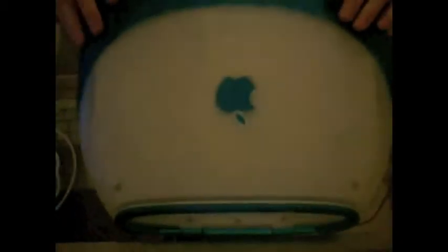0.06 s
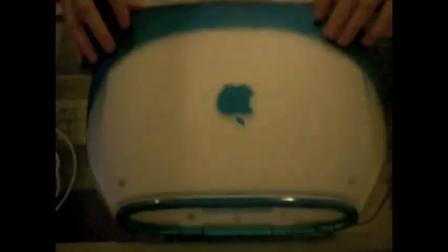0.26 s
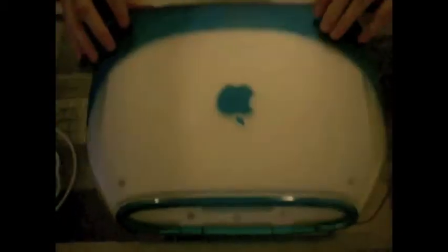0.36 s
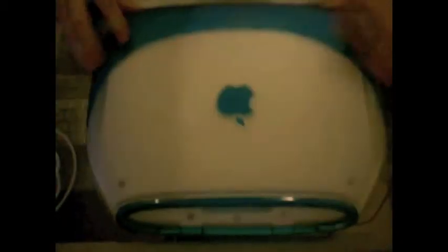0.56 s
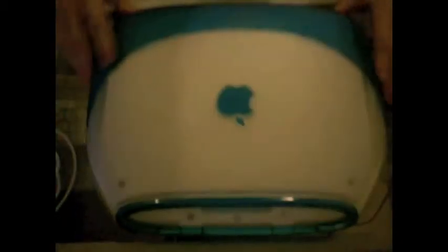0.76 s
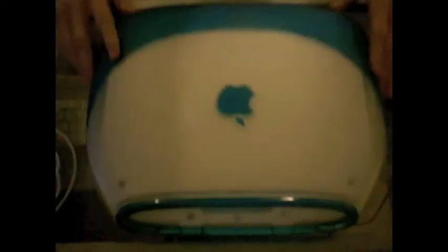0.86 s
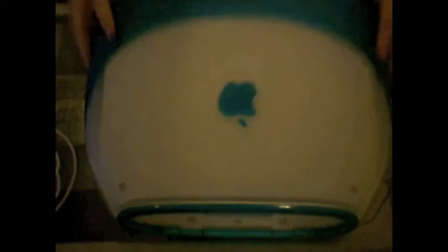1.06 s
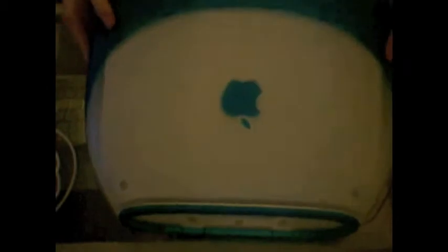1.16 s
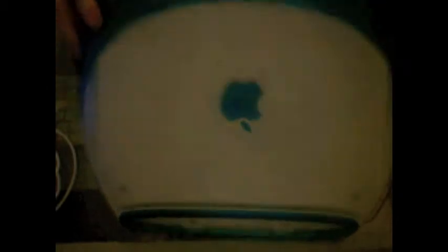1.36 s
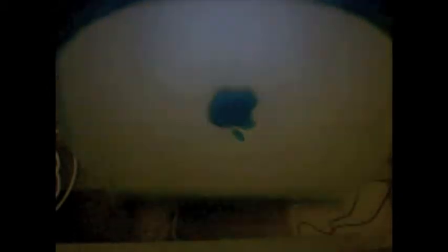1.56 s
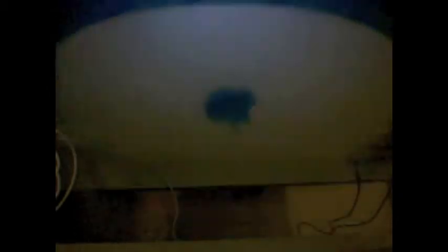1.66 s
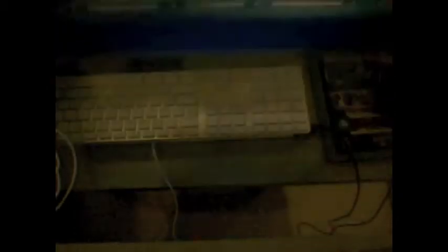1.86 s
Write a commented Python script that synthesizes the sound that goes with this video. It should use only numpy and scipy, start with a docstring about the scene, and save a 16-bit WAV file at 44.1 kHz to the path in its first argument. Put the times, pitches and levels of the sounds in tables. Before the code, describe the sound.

A plastic laptop is pressed shut and moved on a wooden table. Hands slide softly from 0.1 s, then the loudest clack and table thud land at 0.25 s. Quieter rubbing follows, with clustered knocks and creaks at 0.7-1.0 s, a firm thud at 1.2 s, a sharp tick at 1.3 s, then lighter clicks and slides until 1.9 s. Close, small quiet room, low wavering hum and hiss.

```python
"""On a wooden table in a small quiet room, a plastic laptop is pressed shut, shifted and lifted.
First sliding hands hiss and the shell knocks lightly; then the loudest blow, knock, tick and table thud together.
Creaks, knocks, thuds and ticks follow in bursts, made by short contacts that ring shell and table modes.
The last part is lighter knocks, ticks and slides. Throughout lie noise-driven table rumble, a wavering hum
and hiss, taken from one spot with far more direct sound than room, in two channels."""
import sys
import numpy as np
from scipy import signal
from scipy.fft import rfft, irfft
from scipy.io import wavfile
from scipy.ndimage import uniform_filter1d

SR = 44100
rng = np.random.default_rng(int(sys.argv[2]) if len(sys.argv) > 2 else 0)


def boost(x):
    """Linear amplitude factor 10**(x/20) for a level x in decibels (scalar or array-like)."""
    u = np.asarray(x, float) / 20
    return 10 ** u


def dump(signal):
    """Clip the signal to [-1, 1] and save it as 16-bit WAV at the path in sys.argv[1]."""
    limited = np.clip(np.atleast_2d(signal).T, -1, 1)
    pcm = np.round(limited * 32767).astype(np.int16)
    wavfile.write(sys.argv[1], SR, pcm)


N = 83790  # samples, 1.9 s


def colour(x, points):
    """Filter by (frequency [Hz], gain [dB]) points joined on a log frequency axis."""
    p = np.array(points, float)
    hz = np.arange(len(x) // 2 + 1) * SR / len(x) + 1  # 1 Hz up, so the log is finite
    gain_db = np.interp(np.log(hz), np.log(p[:, 0]), p[:, 1])
    return irfft(rfft(x) * boost(gain_db), len(x))


def unit(x):
    """Scale to rms 1."""
    return x / np.sqrt(np.mean(x ** 2))


def unit_energy(x):
    """Scale so that white noise filtered by x keeps its rms."""
    return x / np.sqrt(np.sum(x ** 2))


def walk(rate):
    """Random levels held for 1 / rate seconds, then smoothed twice over that time."""
    hold = int(SR / rate)
    steps = np.repeat(rng.standard_normal(N // hold + 1), hold)
    return 1.65 * uniform_filter1d(uniform_filter1d(steps, hold), hold)[:N]


def ring(modes, gains_db, chance, sign=-0.96):
    """Decaying sines with level and pitch varied by chance; sign ** index sets polarity and a slight taper."""
    detune, spread_db = 0.01, 1.5  # per unit of chance; detune is a fraction of the pitch
    m, t = np.array(modes, float), np.arange(SR // 3)[:, None] / SR
    hz = m[:, 0] * (1 + detune * chance[0])
    gain = sign ** np.arange(len(m)) * boost(m[:, 1] + gains_db + spread_db * chance[1])
    decay = boost(-60 * t / m[:, 2])
    return (np.sin(2 * np.pi * hz * t) * decay) @ gain


def near_spot(modes, hz, octaves):
    """Gain [dB] of each mode: modes far in pitch from the struck spot answer less, -6 dB at octaves away."""
    distance = np.log2(np.array(modes)[:, 0]) - np.log2(hz)
    return -6 * (distance / octaves) ** 2


def add(out, s, db, sound):
    """Lay a sound at time s with the given peak level."""
    i = int(s * SR)
    out[i:i + len(sound)] += (boost(db) * sound / np.abs(sound).max())[:N - i]


def dull(x):
    """The plastic shell radiates little treble and no bass."""
    low_hz, top_hz = 233, 3240
    return signal.sosfilt(signal.butter(2, [low_hz, top_hz], "band", fs=SR, output="sos"), x)


# the shell is knocked or scraped: (time [s], peak level [dB], pitch region of the spot [Hz], contact [s])
SHELL_KNOCKS = [(.102, -30.5, 727, 0.0025), (.168, -36.5, 510, 0.015), (0.195, -32, 1510, 0.0025),
                (.200, -31.5, 557, 0.0069), (0.204, -28, 1060, 0.0034), (.214, -31, 540, 0.00073),
                (0.246, -8, 701, 0.0013), (0.2489, -15.5, 1140, 0.0013), (.249, -20.5, 560, 0.0069),
                (.268, -42, 575, 0.0056), (.257, -33, 576, 0.013), (0.311, -34.5, 1800, 0.006),
                (.3115, -21, 980, 0.0021), (.322, -32, 660, 0.017), (.335, -51, 415, 0.012),
                (.385, -33, 820, 0.00083), (.451, -34.5, 415, 0.0013), (.486, -37, 1000, 0.0025),
                (.659, -37, 455, 0.0065), (.685, -27.5, 754, 0.0027), (.728, -36, 580, 0.011),
                (.741, -25.5, 990, 0.0024), (.745, -18.5, 496, 0.0074), (.765, -17.5, 488, 0.0086),
                (.783, -27, 980, 0.00047), (0.794, -26, 1170, 0.0082), (.802, -34, 1060, 0.0037),
                (0.81, -27, 1210, 0.0086), (.789, -20, 492, 0.0096), (.797, -23, 437, 0.01),
                (.808, -31.5, 510, 0.0088), (.820, -26.5, 495, 0.0083), (.833, -26, 925, 0.0017),
                (.841, -30.5, 1220, 0.0046), (.855, -23.5, 565, 0.0027), (.876, -39, 415, 0.0029),
                (.930, -26, 478, 0.0064), (.942, -22.5, 630, 0.0027), (0.958, -17, 432, 0.008),
                (.972, -30.5, 462, 0.0056), (1.126, -43, 1060, 0.0013), (1.133, -27, 580, 0.0036),
                (1.206, -25.5, 566, 0.012), (1.210, -25.5, 950, 0.00033), (1.215, -23.5, 904, 0.0048),
                (1.226, -21.5, 415, 0.0093), (1.233, -23, 1030, 0.0015), (1.243, -41, 415, 0.0046),
                (1.255, -27, 1060, 0.0052), (1.272, -41, 395, 0.0083), (1.31, -26, 833, 0.0038),
                (1.383, -27, 900, 0.0013), (1.418, -26.5, 400, 0.014), (1.493, -34, 800, 0.0013),
                (1.494, -26.5, 430, 0.013), (1.511, -28, 950, 0.0025), (1.511, -26, 415, 0.0054),
                (1.521, -30.5, 413, 0.0072), (1.544, -31, 910, 0.003), (1.5545, -25.5, 1064, 0.0027),
                (1.594, -36.5, 442, .005), (1.662, -52, 415, 0.01), (1.755, -39.5, 990, 0.0029),
                (1.846, -29, 750, 0.00078), (1.866, -32.5, 1030, 0.0012), (1.886, -48, 1290, 0.0045)]
# resonances of the plastic shell: (frequency [Hz], relative level [dB], decay by 60 dB [s])
SHELL_RESONANCES = [(415, 4, 0.034), (467.3, 6, 0.03), (516, 10.5, 0.016), (612.7, -3, 0.047),
                    (764, -0.5, 0.017), (878.4, 7, 0.016), (950, 9, 0.016), (1070, 8, 0.0091),
                    (1255, -0.5, 0.016), (1368, -1, 0.0092), (1592, -6.5, 0.054), (1800, -3.5, 0.0093),
                    (2160, -12, 0.033), (2620, -9, 0.008)]


def knocks():
    """The contact chatters roughly at the spot's pitch while it lasts; modes near that pitch answer most."""
    spot_octaves, least_answer_db, contact_db = 0.54, -22, 3  # contact_db: bare chatter over ringing
    out, t = np.zeros(N), np.arange(2048) / SR
    for s, db, hz, contact in SHELL_KNOCKS:
        near_db = np.maximum(near_spot(SHELL_RESONANCES, hz, spot_octaves), least_answer_db)
        swell = np.sin(np.pi * np.clip(t / max(contact, .0004), 0, 1)) ** 2
        grit = uniform_filter1d(rng.standard_normal(len(t)), size=8)
        chatter = swell * (np.sin(2 * np.pi * hz * t) + grit)
        chance = rng.standard_normal((2, len(SHELL_RESONANCES)))
        rung = signal.fftconvolve(ring(SHELL_RESONANCES, near_db, chance), chatter)
        direct = np.pad(chatter, (0, len(rung) - len(t))) / np.abs(chatter).max()
        add(out, s, db, dull(rung / np.abs(rung).max() + boost(contact_db) * direct))
    return out


# the case meets the table: (time [s], peak level [dB], pitch region of the spot [Hz], contact [s])
TABLE_THUDS = [(0.2459, -19, 288, 0.0029), (0.255, -12.5, 205, 0.0038), (0.277, -21.5, 139, 0.0044),
               (0.297, -21, 278, 0.0017), (0.461, -26.5, 190, 0.0026), (0.566, -42, 79, 0.012),
               (0.586, -34, 130, 0.004), (0.954, -25, 206, 0.0027), (0.979, -26, 135, 0.0032),
               (1.003, -31.5, 84, 0.0092), (1.04, -27.5, 130, 0.0048), (1.2019, -13.5, 152, 0.0022),
               (1.222, -20.5, 330, 0.0021), (1.263, -26.5, 120, 0.0042), (1.289, -31.5, 130, 0.0079),
               (1.422, -26, 220, 0.0014), (1.436, -26.5, 125, 0.0058)]
# resonances of the table top: (frequency [Hz], relative level [dB], decay by 60 dB [s])
TABLE_RESONANCES = [(77, -12, 0.3), (135.2, 2, 0.14), (189.8, -2, 0.088), (230, -3, 0.078),
                    (288.6, 0.5, 0.1), (331.3, -10.5, 0.22)]


def thuds():
    """A soft push rings the table top, most near the spot's pitch; the deepest bass does not radiate."""
    spot_octaves, low_hz = 0.84, 72
    out = np.zeros(N)
    radiation = signal.butter(2, low_hz, "high", fs=SR, output="sos")
    for s, db, hz, contact in TABLE_THUDS:
        near_db = near_spot(TABLE_RESONANCES, hz, spot_octaves)
        push = np.hanning(int(contact * SR))
        chance = rng.standard_normal((2, len(TABLE_RESONANCES)))
        rung = signal.fftconvolve(ring(TABLE_RESONANCES, near_db, chance, sign=0.91), push)
        add(out, s, db, -signal.sosfilt(radiation, rung))
    return out


# hard edges tick: (time [s], peak level [dB], contact [s], top of the tick's band [Hz])
EDGE_TICKS = [(0.101, -35, 0.0038, 7200), (0.2458, -10.5, 0.0027, 12800), (.312, -49, 0.0013, 5000),
              (0.3425, -36, 0.0012, 8030), (0.686, -34.5, 0.00095, 5330), (.538, -42, 0.0045, 9000),
              (.715, -42, 0.0016, 11100), (0.745, -25, 0.00086, 6400), (0.785, -31.5, 0.016, 12300),
              (0.8396, -18.5, 0.0025, 11200), (0.936, -50, 0.0032, 8000), (1.048, -47, .002, 6000),
              (0.96, -31, 0.0068, 8800), (1.127, -28.5, 0.0012, 14000), (1.209, -26.5, 0.0078, 10100),
              (1.312, -17.5, 0.0026, 12700), (1.3846, -24, 0.00076, 15000), (1.407, -26.5, 0.0011, 9000),
              (1.497, -31, 0.015, 7700), (1.511, -27, 0.0021, 7000), (1.555, -30, 0.0017, 6950),
              (1.579, -30.5, 0.0034, 12000), (1.755, -41.5, 0.004, 9000), (1.801, -36.5, 0.0047, 14000),
              (1.846, -34.5, 0.0037, 11000), (1.867, -32, 0.00088, 11000), (1.884, -32.5, 0.0075, 11000)]
# spectrum of a tick before its band limits: (frequency [Hz], gain [dB])
TICK_SPECTRUM = [(900, 11.5), (2000, 8.5), (3300, -1.5), (5000, 1.5), (6500, 2), (8500, -7), (12000, -18.5),
                 (16000, -33)]


def ticks():
    """A noise crack as long as the contact, then hissy scatter off table and walls; blunt edges are duller."""
    tail_db, tail_t60_s = -17, 0.18
    rise = 3.0  # rise speed per contact length
    out, t = np.zeros(N), np.arange(SR // 4) / SR
    for s, db, contact, top_hz in EDGE_TICKS:
        u = t / contact
        scatter = boost(tail_db - 60 * t / tail_t60_s)
        shape = (1 - np.exp(-rise * u)) * (np.exp(-u) + scatter)
        edge = signal.butter(3, [900, top_hz], "band", fs=SR, output="sos")
        noise = colour(rng.standard_normal(len(t)), TICK_SPECTRUM)
        add(out, s, db, signal.sosfilt(edge, noise * shape))
    return out


# hands and feet slide: (start [s], length before the fade [s], hiss level [dB],
# shell rattle level before the shell dulls it [dB])
SLIDE_STROKES = [(0.092, 0.14, -62.5, -56), (0.181, 0.13, -51, -46.5), (0.234, 0.12, -51.5, -38),
                 (0.364, 0.058, -50, -46.5), (0.456, 0.042, -62, -41.5), (0.524, 0.056, -56, -55),
                 (0.608, 0.049, -62, -46.5), (0.699, 0.069, -57, -43), (0.747, 0.023, -53, -38.5),
                 (0.775, 0.056, -48.5, -35), (0.842, 0.023, -46.5, -46), (0.856, 0.057, -53.5, -56),
                 (0.923, 0.048, -47.5, -34), (0.98, 0.082, -57.5, -48), (1.045, 0.068, -63.5, -52),
                 (1.13, 0.11, -57.5, -48), (1.196, 0.063, -52, -35), (1.264, .035, -52.5, -42.5),
                 (1.307, 0.072, -47.5, -46.5), (1.383, 0.022, -54, -40.5), (1.427, 0.072, -50.5, -44.5),
                 (1.48, 0.063, -44.5, -40.5), (1.541, 0.048, -51.5, -40.5), (1.585, 0.041, -48, -46),
                 (1.635, 0.046, -53, -47), (1.674, 0.056, -50.5, -58.5), (1.747, 0.067, -55, -54.5),
                 (1.827, 0.14, -54, -49.5)]
# spectrum of skin on plastic: (frequency [Hz], density [dB per Hz])
SKIN_SPECTRUM = [(700, 4), (1500, -1), (2500, -9.5), (3500, -5.5), (5500, -2), (7500, -4.5), (10000, -16.5),
                 (14000, -26), (16000, -51)]


def slide():
    """Skin hisses over plastic while small uneven slips rattle the shell."""
    rise_s, fade_s = 0.011, 0.012
    slips_per_s, slip_db = 2500, 1.5  # slip_db: mean of the exponential spread
    rattle_uneven_db, hiss_uneven_db = 2, 1.2
    t, c = np.arange(N) / SR, np.array(SLIDE_STROKES)[:, :, None]
    late = t - c[:, 0]
    shape = np.clip(late / rise_s, 0, 1) * np.exp(-np.maximum(late - c[:, 1], 0) / fade_s)
    hiss_level = (shape * boost(c[:, 2])).sum(axis=0)
    rattle_level = (shape * boost(c[:, 3])).sum(axis=0)

    happens = rng.random(N) < slips_per_s / SR
    slips = unit(happens * boost(slip_db * rng.exponential(size=N)) * rng.standard_normal(N))
    body = ring(SHELL_RESONANCES, 0, np.zeros((2, len(SHELL_RESONANCES))))
    force = slips * rattle_level * boost(rattle_uneven_db * walk(120))
    rattle = signal.fftconvolve(force, unit_energy(body))[:N]

    skin = unit(colour(rng.standard_normal(N) + 0.25 * slips, SKIN_SPECTRUM))
    hiss = skin * hiss_level * boost(hiss_uneven_db * walk(39.6))
    return dull(rattle) + hiss


# the weight of the moving case keeps the table rumbling: (time [s], level [dB])
RUMBLE_LEVEL = [(0, -52), (.18, -52), (.26, -35), (.4, -40.5), (.53, -37.5), (.62, -50), (.7, -46.5),
                (.9, -48), (.96, -38.5), (1.1, -50), (1.18, -55), (1.22, -44), (1.34, -42), (1.4, -48),
                (1.45, -45), (1.5, -46), (1.6, -51), (1.9, -58)]


def rumble():
    """An uneven noise push drives the table's modes, its strength following the level table."""
    uneven_db = 2
    c = np.array(RUMBLE_LEVEL)
    top = ring(TABLE_RESONANCES, 0, np.zeros((2, len(TABLE_RESONANCES))))
    level_db = np.interp(np.arange(N) / SR, c[:, 0], c[:, 1])
    force = rng.standard_normal(N) * boost(level_db + uneven_db * walk(30))
    return signal.fftconvolve(force, unit_energy(top))[:N]


# spectrum of the quiet room: (frequency [Hz], density [dB per Hz])
ROOM_SPECTRUM = [(18, -38), (30, -11), (121, -1), (336, -10), (415, -4), (666, -14), (866, -12),
                 (1220, -19), (1630, -20), (2980, -30), (6720, -30), (13700, -49), (16000, -65)]


def room_tone():
    """Nearly steady broad noise, and a low sine hum that wavers in pitch and level."""
    noise_db = -47.5  # rms
    hum_hz, hum_db, hum_waver_db = 121.7, -49, 1
    hum_pitch = hum_hz * (1 + 0.026 * walk(9.47))
    hum = np.sin(2 * np.pi * np.cumsum(hum_pitch) / SR) * boost(hum_db + hum_waver_db * walk(11.4))
    noise = unit(colour(rng.standard_normal(N), ROOM_SPECTRUM))
    return noise * boost(noise_db + 0.5 * walk(2.3)) + hum


def small_room(hits):
    """Walls answer thuds and knocks with a decaying noise tail that begins after 4 ms."""
    room_db, t60_s = -13, .22
    t = np.arange(SR // 2) / SR
    tail = rng.standard_normal(len(t)) * boost(-60 * t / t60_s) * (t > .004)
    return boost(room_db) * signal.fftconvolve(hits, unit_energy(tail))[:N]


def scene():
    """All sources in a small room, heard from one spot, the same in both channels."""
    hits = knocks() + thuds()
    mid = hits + small_room(hits) + ticks() + slide() + rumble() + room_tone()
    return np.array([mid, mid])


def roll_off(x):
    """The treble ends steeply here."""
    return signal.sosfilt(signal.butter(12, 16470, fs=SR, output="sos"), x)


# rough left-right noise that follows the sound, strongest in the treble: (frequency [Hz], gain [dB])
ROUGH_SIDE_SPECTRUM = [(100, -42), (500, -52), (2000, -42), (4000, -28), (8000, -12.5), (15000, -10)]


def record(dry):
    """The microphone drops deep bass and top treble; each channel hisses, and rough side noise follows the sound."""
    low_hz, top_hz = 29.3, 15800
    hiss_db, hiss_top_hz = -67, 14900  # hiss rms before its treble cut
    roughness_per_s = 2000
    band = np.vstack([signal.butter(2, low_hz, "high", fs=SR, output="sos"),
                      signal.ellip(6, .3, 40, top_hz, fs=SR, output="sos")])
    # the sound times fast random levels, opposite in left and right
    rough_side = colour(dry[0], ROUGH_SIDE_SPECTRUM) * walk(roughness_per_s)
    hiss_band = signal.ellip(6, .3, 30, hiss_top_hz, fs=SR, output="sos")
    hiss = boost(hiss_db) * signal.sosfilt(hiss_band, rng.standard_normal(dry.shape))
    mix = signal.sosfilt(band, dry + rough_side * np.array([[1], [-1]]) + hiss)
    return roll_off(mix)


dry = scene()
out = record(dry)
dump(out)
```